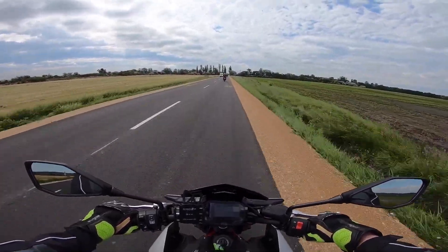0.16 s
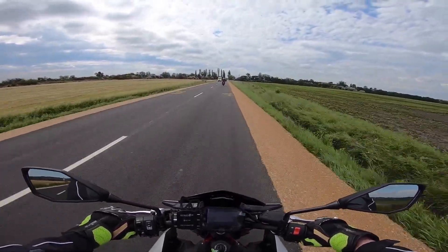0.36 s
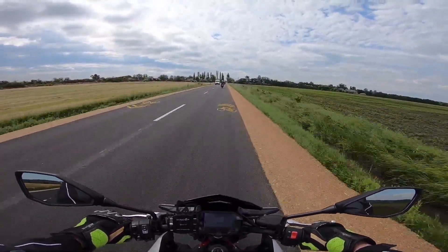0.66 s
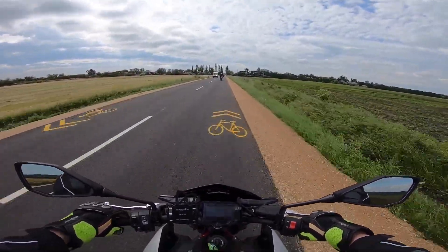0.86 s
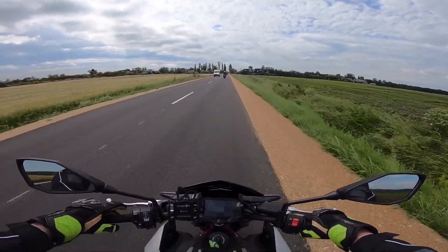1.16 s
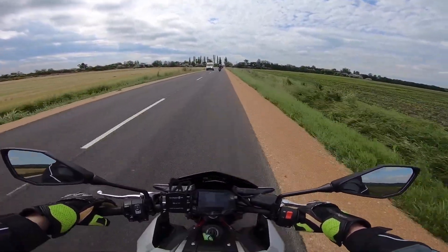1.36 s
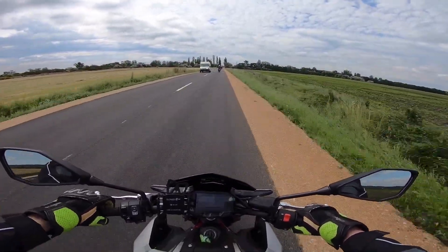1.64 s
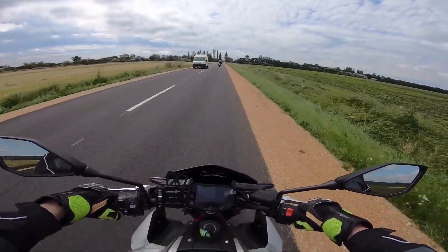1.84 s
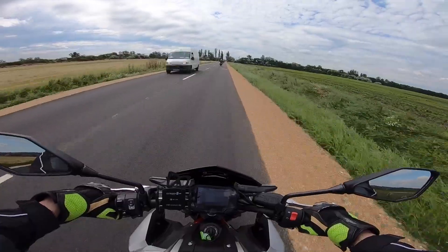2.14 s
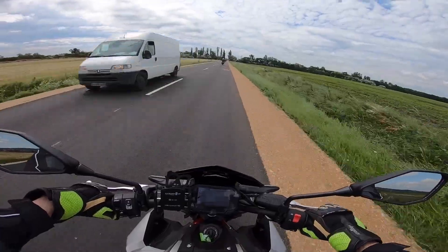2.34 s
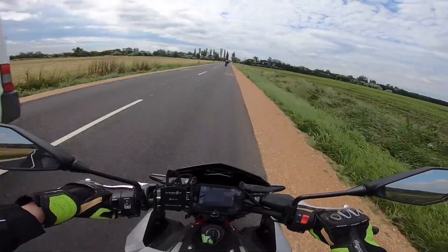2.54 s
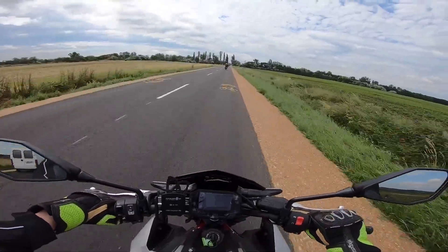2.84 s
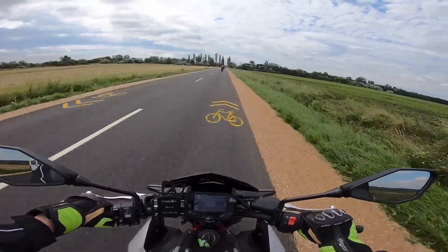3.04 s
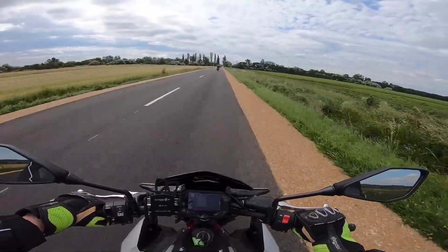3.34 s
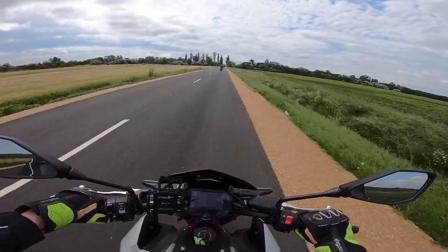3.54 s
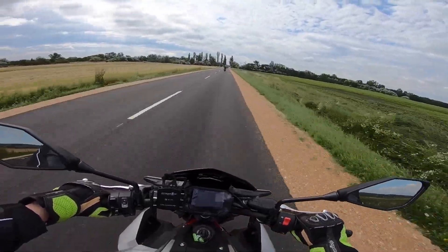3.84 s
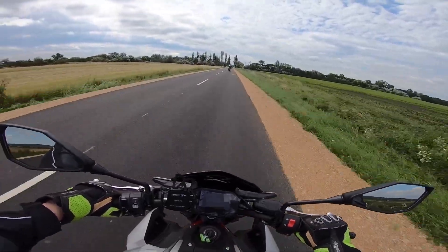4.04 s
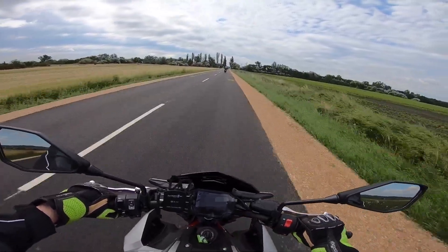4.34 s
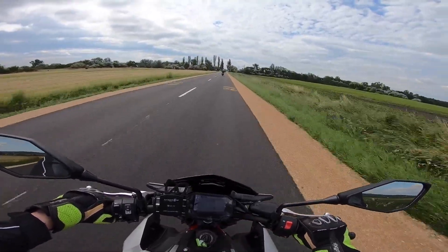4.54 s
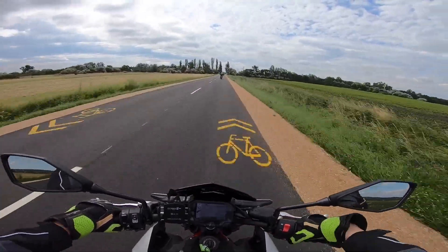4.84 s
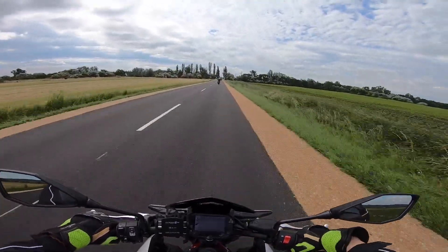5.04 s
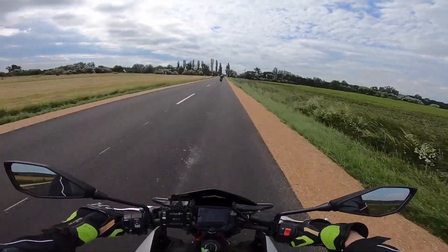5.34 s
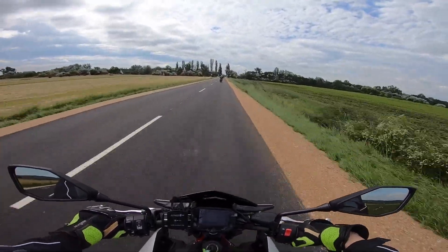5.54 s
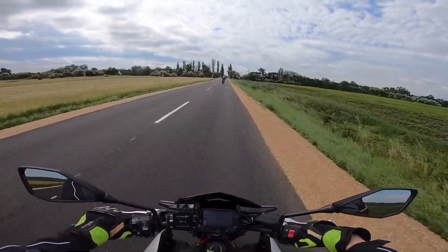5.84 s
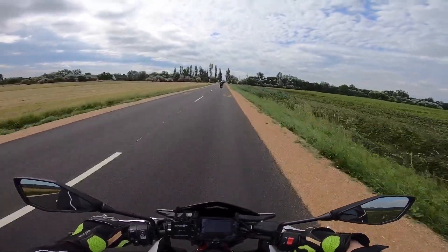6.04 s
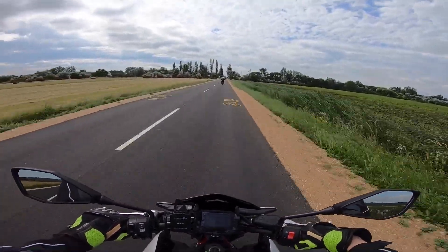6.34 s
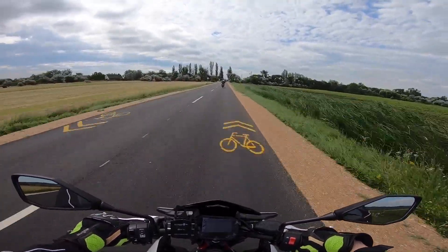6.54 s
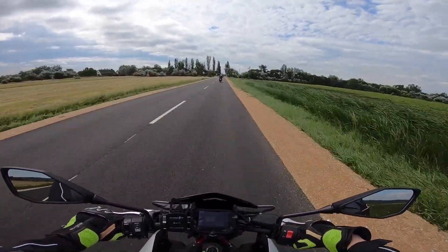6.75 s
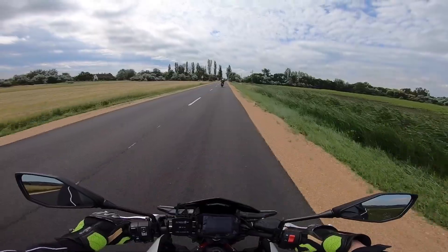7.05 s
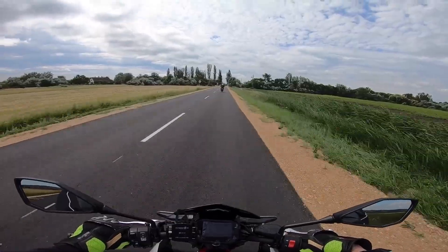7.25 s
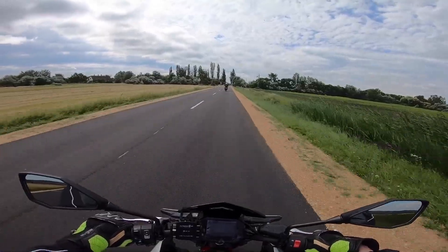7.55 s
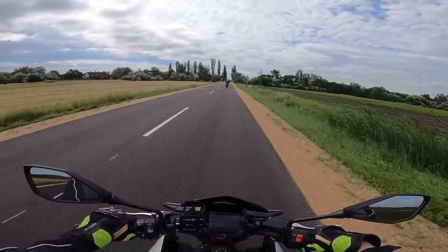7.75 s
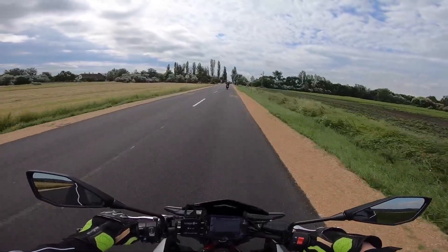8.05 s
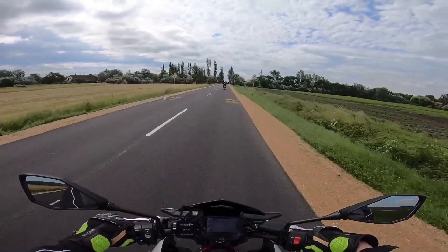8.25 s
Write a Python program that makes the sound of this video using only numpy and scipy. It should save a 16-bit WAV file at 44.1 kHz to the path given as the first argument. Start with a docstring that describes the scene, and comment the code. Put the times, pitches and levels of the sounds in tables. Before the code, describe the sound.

A four-cylinder motorcycle cruises on an open road, heard from the rider's chest, with a droning exhaust, thin gear whine and tyre hum under heavy wind buffeting. The throttle opens and the intake roars, engine pitch and wind climbing together. Then the throttle snaps shut, the roar drops away and the bike coasts with falling pitch, while gusts thump the microphone and the wind eases.

```python
"""A four-cylinder motorcycle on an open road, heard from the rider's chest, in one gear throughout.
It cruises first: the exhaust drones, the gears whine, wind buffets the microphone and the tyres hum.
At 2.4 s the throttle rolls open, the airbox roars, and engine pitch and wind climb with the speed.
At 4.9 s the throttle snaps shut and the bike coasts: the roar drops away and vortices thump the
microphone. From about 6.5 s a few faint edge whistles flick past as the wind eases."""
import sys
import numpy as np
from scipy import signal
from scipy.fft import rfft, irfft, next_fast_len
from scipy.io import wavfile
from scipy.ndimage import uniform_filter1d, map_coordinates

SR = 44100
rng = np.random.default_rng(int(sys.argv[2]) if len(sys.argv) > 2 else 0)


def bounce(signal):
    """Save signal as a 16-bit WAV file at the path given by the first command-line argument."""
    frames = np.transpose(np.atleast_2d(signal))
    limited = np.clip(frames, -1, 1)
    pcm = np.round(limited * 32767).astype(np.int16)
    wavfile.write(sys.argv[1], SR, pcm)


N = 369999
TIME = np.arange(N) / SR

OPEN_S, OPENING_S, SHUT_S, SHUTTING_S = 2.382, 0.43, 4.9, 0.072  # throttle moves: start and duration
MID_SPEED_HZ = 150  # octaves of speed are counted from this firing rate

# Engine speed, and so road speed. Each row: time in seconds, firing rate in Hz.
FIRING_RATE = [(0, 123), (1, 127.9), (2, 131.6), (2.5, 134.7), (3, 145.1), (4.5, 178.6), (4.92, 187.2),
               (6, 167.6), (7, 152.3), (7.5, 146.6), (8.4, 139.5)]
# The engine block's hum. Each row: multiple of the firing rate, level in dB.
BLOCK_HUM = [(2, -43), (4, -61), (5, -62), (6, -64), (7, -59), (10, -66)]
# Airbox boom from all four cylinders in step, boom from the two pairs in turn, and the higher rasp.
# Each row: frequency in Hz, gain in dB.
AIRBOX_IN_STEP = [(240, -23), (274, -20.5), (297, -43), (310, -31.5), (338, -27.5), (372, -28),
                  (425, -35.5), (450, -50.5), (545, -40.5), (630, -58)]
AIRBOX_IN_TURN = [(190, -57.5), (215, -44), (232, -25), (254, -20), (280, -23), (352, -19.5), (380, -24),
                  (420, -40), (465, -38), (620, -52)]
AIRBOX_RASP = [(150, -60), (260, -45), (380, -42), (500, -50), (615, -64), (700, -53), (780, -56),
               (870, -48.5), (925, -46), (975, -50), (1020, -44), (1070, -55), (1135, -48), (1230, -61),
               (1400, -57), (1900, -64), (2600, -62), (3300, -76)]
# Gear mesh rates. Each entry: one gear pair's multiple of the firing rate.
MESH_MULTIPLES = [7.55, 8.3, 11.31, 25.5]
# Whine of those pairs. Each row: cruising, pulling and coasting levels in dB, dB per octave of speed.
MESH_LEVELS = [(-53, -51.5, -64, 15), (-50, -47, -64, 3), (-52.5, -55.5, -62, 2.5),
               (-65.5, -62.5, -80, -3.5)]
# The engine casing's ring, for mesh tones and for their overtones. Each row: frequency in Hz, gain in dB.
CASING_FOR_MESH = [(920, 6.5), (980, -3), (1025, -1.5), (1100, -6), (1160, 2), (1250, -6.5), (1325, 2.5),
                   (1400, -2.5), (1525, 0.5), (1600, -4), (1790, -8), (1950, -1), (3100, -9), (3260, 1),
                   (3450, -1.5), (3560, -7), (3720, 1.5), (3870, -6.5), (4030, 3.5), (4180, -7), (4370, 5),
                   (4550, -9)]
CASING_FOR_OVERTONES = [(1800, -28), (2200, -21), (2330, -4), (2520, -15), (2850, -20), (3850, -20),
                        (4080, -4), (4250, -4), (4450, -16), (5900, -25), (6330, -12), (6550, -25),
                        (9500, -21)]
# Colours of the four wind layers, dark to bright. Each row: frequency in Hz, relative density in dB.
BUFFET_SPECTRUM = [(10, -14.5), (22, 0.5), (40, 1), (70, 3), (100, -2), (140, -8.5), (250, -28.5),
                   (600, -71.5)]
EDDY_SPECTRUM = [(50, -9.5), (100, 0), (150, 0), (210, -4), (270, -8.5), (360, -15), (450, -20), (600, -32),
                 (1500, -55)]
RUSH_SPECTRUM = [(200, -6), (450, 3.5), (650, 3), (950, 3), (1400, 1.5), (1800, -3), (2250, -10),
                 (2450, -6.5), (2850, -8), (3150, -14), (4200, -17.5), (6000, -28), (12000, -67.5)]
HISS_SPECTRUM = [(2000, -14), (4200, 3), (5200, 1.5), (6600, -1), (7800, -3.5), (8900, -6), (9900, -4.5),
                 (11500, -10.5), (13500, -12.5), (15700, -20.5)]
# Their faders. Each holds: level at mid speed in dB, dB per octave of speed, coasting change in dB.
BUFFET_FADER = (-25, 21.5, -2.9)
EDDY_FADER = (-27, 17.6, 3.2)
RUSH_FADER = (-42.5, 16.8, 2.07)
HISS_FADER = (-61, 24.3, 0)
# Puffs in the rush, gusts in the buffeting and lulls in all the wind.
# Each row: centre in seconds, half-width in seconds, level change in dB.
RUSH_PUFFS = [(.58, .035, 4.5), (1.35, 0.027, 4), (2.95, 0.17, 3.5), (5.32, 0.041, 3), (5.65, .18, 1.5),
              (6.2, .03, 2), (6.61, 0.03, 3)]
BUFFET_GUSTS = [(2.15, .4, 3.5), (5.55, .25, 2.5), (7.55, 0.54, 4)]
WIND_LULLS = [(4.962, 0.022, -5), (5.19, .07, -1), (8.33, 0.22, -2)]
# Vortices crossing the microphone. Each row: centre in seconds, suction in dB, half-width in seconds.
VORTEX_THUMPS = [(4.995, -11, 0.0053), (5.012, -12, .002), (5.117, -9, 0.0047), (5.287, -7, 0.00096),
                 (5.322, -9, .0013), (5.491, -5.5, .0015), (5.741, -7.5, 0.0014), (5.778, -14, 0.0016),
                 (6.208, -13, 0.00075), (6.991, -6.5, .0016), (7.249, -13.5, 0.0018)]
# Air whistling at an edge. Each row: centre in seconds, half-width in seconds, pitch in Hz, level in dB.
EDGE_WHISTLES = [(6.49, .04, 4950, -64), (6.655, .065, 4780, -56.5), (7.62, .05, 4530, -64.5),
                 (8.04, .05, 4430, -64)]


def amp(db):
    """Decibels to gain."""
    return 10 ** (np.asarray(db) / 20)


def unit(x):
    """Scale to rms 1."""
    return x / np.sqrt(np.mean(x ** 2) + 1e-20)


def eq_gain(points, hz):
    """Gain of an EQ curve of (Hz, dB) points, fading to silence an octave past either end."""
    point_hz, db = np.transpose(points)
    padded_hz = np.r_[point_hz[0] / 2, point_hz, point_hz[-1] * 2]
    return amp(np.interp(np.log(hz + 1e-3), np.log(padded_hz), np.r_[-120, db, -120]))


def wobble(rate):
    """A smooth random curve, rate knots a second."""
    knots = rng.standard_normal(int(N * rate / SR) + 4)
    coarse = TIME[::32]
    return np.interp(TIME, coarse, map_coordinates(knots, [coarse * rate]))


def filtered(x, response):
    """Filter x with a gain given as a function of Hz."""
    size = next_fast_len(N + SR // 2)
    return irfft(rfft(x, size) * response(np.fft.rfftfreq(size, 1 / SR)), size)[..., :N]


def noise(spectrum, patchy_db):
    """Noise of rms 1, coloured by (Hz, dB) points and mottled in time and frequency."""
    bins = signal.stft(rng.standard_normal(N), nperseg=512)[2]
    patches = uniform_filter1d(rng.standard_normal(bins.shape), size=6, axis=0)
    patches = unit(uniform_filter1d(patches, size=10, axis=1))
    mottled = signal.istft(bins * amp(patchy_db * 2 * np.tanh(patches / 2)), nperseg=512)[1][:N]
    return unit(filtered(mottled, lambda hz: eq_gain(spectrum, hz)))


def tone(turns):
    """A sine of rms 1 at a random starting phase."""
    return np.sqrt(2) * np.sin(2 * np.pi * (turns + rng.random()))


def ramp(start_s, length_s):
    """Rises from 0 to 1 and stays there."""
    return np.clip((TIME - start_s) / length_s, 0, 1)


def swells(rows):
    """A fader ride in dB made of bell-shaped swells and dips."""
    return sum(db * np.exp(-((TIME - centre_s) / width_s) ** 2) for centre_s, width_s, db in rows)


def throttled(cruise_db, pull_db, coast_db, lag_s=0, swell_s=OPENING_S):
    """A level that moves from cruising to pulling to coasting with the throttle."""
    opened, shut = ramp(OPEN_S + lag_s, swell_s), ramp(SHUT_S, SHUTTING_S)
    return (cruise_db + (pull_db - cruise_db) * opened) * (1 - shut) + coast_db * shut


def exhaust(turns):
    """The exhaust drones at the firing rate and swells a little after the intake."""
    level_db = throttled(cruise_db=-26.5, pull_db=-17.5, coast_db=-29.5, lag_s=0.31, swell_s=.18)
    return amp(level_db + 1.3 * wobble(20)) * tone(turns)


def engine_block(turns):
    """The block hums softly on harmonics of the firing rate."""
    return sum(amp(db + 1.4 * wobble(3)) * tone(multiple * turns) for multiple, db in BLOCK_HUM)


def airbox(firing_hz, turns, load_db):
    """The roar: harmonics of the four-stroke cycle sweep through the airbox resonances."""
    boom, rasp = np.zeros(N), np.zeros(N)
    uneven_turns = turns + .002 * wobble(120)
    imbalance = amp(0.46 * load_db)  # the cylinder pairs draw more unequally under load
    for harmonic in range(5, 80):
        multiple = harmonic / 4  # four firings to a cycle
        hz = firing_hz * multiple
        in_step = harmonic % 4 == 0
        if harmonic % 2 == 0 and harmonic <= 16:
            gain = eq_gain(AIRBOX_IN_STEP, hz) if in_step else imbalance * eq_gain(AIRBOX_IN_TURN, hz)
            boom += gain * tone(multiple * turns)
        else:
            accent_db = (4.5 if in_step else -1.5) + 2.2 * wobble(4)
            rasp += eq_gain(AIRBOX_RASP, hz) * amp(accent_db) * tone(multiple * uneven_turns)
    return amp(load_db) * (boom * amp(0.77 * wobble(25)) + rasp)


def gulps(turns, load_db):
    """Air tears past the throttle plates at every intake stroke, loudest from the nearest cylinder."""
    air = noise([(500, -15), (720, -13), (950, -3.5), (1400, 2), (2000, -21), (2700, -15),
                 (3500, -18.5), (7000, -33), (14000, -33.5)], patchy_db=2)
    strokes = unit(amp(3.5 * tone(turns) + 4 * tone(turns / 4)))
    return amp(load_db - 46) * air * strokes


def gears(firing_hz, turns, octaves):
    """Each gear pair sings at its mesh rate, fluttering, and blooms as it crosses a casing resonance."""
    out = np.zeros(N)
    for multiple, (*levels_db, db_per_octave) in zip(MESH_MULTIPLES, MESH_LEVELS):
        mesh_hz = multiple * firing_hz
        mesh_turns = multiple * (turns + .005 * wobble(45))
        whine = eq_gain(CASING_FOR_MESH, mesh_hz) * tone(mesh_turns)
        overtone = eq_gain(CASING_FOR_OVERTONES, 2 * mesh_hz) * tone(2 * mesh_turns)
        # every firing twists the shaft a little, which gives the high tones a sideband
        twist = .02 * multiple * amp(2 * wobble(9))
        sideband = twist * eq_gain(CASING_FOR_MESH, mesh_hz + firing_hz) * tone(mesh_turns + turns)
        flutter_db = 1.2 * wobble(8) + 2 * wobble(40)
        level_db = throttled(*levels_db) + db_per_octave * octaves + flutter_db
        out += amp(level_db) * (whine + overtone + sideband)
    return out


def engine(firing_hz, octaves):
    """All engine layers lock to one firing phase; throttle and speed push the intake up in the mix."""
    load_db = throttled(cruise_db=-23, pull_db=-3, coast_db=-22.5) + 14 * octaves
    turns = np.cumsum(firing_hz) / SR + 0.007 * wobble(8)
    drone = exhaust(turns) + engine_block(turns)
    intake = airbox(firing_hz, turns, load_db) + gulps(turns, load_db)
    return drone + intake + gears(firing_hz, turns, octaves)


def wind(octaves):
    """Wind grows with speed. Large eddies buffet the microphone; their pressure flutters the top end."""
    coasting = ramp(SHUT_S, SHUTTING_S)
    buffet_db, eddy_db, rush_db, hiss_db = [
        db + db_per_octave * octaves + coast_change_db * coasting
        for db, db_per_octave, coast_change_db in (BUFFET_FADER, EDDY_FADER, RUSH_FADER, HISS_FADER)]
    gustiness, puff_db = wobble(22), swells(RUSH_PUFFS)
    buffet, eddies = noise(BUFFET_SPECTRUM, patchy_db=0.45), noise(EDDY_SPECTRUM, patchy_db=1.9)
    pressure = unit(buffet + eddies)
    rumble = amp(buffet_db + swells(BUFFET_GUSTS) + wobble(7)) * buffet
    rumble += amp(eddy_db + 0.89 * gustiness) * eddies
    flutter_db = .8 * gustiness - .55 * pressure
    rush = amp(rush_db + puff_db + flutter_db) * noise(RUSH_SPECTRUM, patchy_db=.7)
    hiss = amp(hiss_db + .5 * puff_db + .6 * wobble(20) + flutter_db) * noise(HISS_SPECTRUM, patchy_db=1)
    return amp(swells(WIND_LULLS)) * (rumble + rush + hiss)


def tyres():
    """A steady bed: the tyre cavities drone and the tread hisses on smooth asphalt."""
    road = noise([(150, -12.5), (200, -3.5), (260, 2), (320, -12), (450, -23.5), (700, -28),
                  (1000, -19), (1500, -29.5), (2700, -25), (4000, -44)], patchy_db=1)
    return amp(-41 + 0.82 * wobble(5)) * road


def vortices():
    """Thumps on the microphone: each vortex core sucks sharply, between two softer pushes."""
    out = np.zeros(N)
    for centre_s, db, width_s in VORTEX_THUMPS:
        offset = (TIME - centre_s) / width_s
        out -= amp(db) * (1 - offset ** 2) * np.exp(-offset ** 2 / 2)
    return out


def whistles():
    """Brief ragged edge tones that sag in pitch as they swell and fade."""
    out = np.zeros(N)
    for centre_s, width_s, hz, db in EDGE_WHISTLES:
        offset = (TIME - centre_s) / width_s
        pitch_hz = hz * (1 - .055 * np.tanh(offset) + .026 * wobble(900))
        envelope = amp(db + 3.3 * wobble(90)) * np.exp(-offset ** 2)
        out += envelope * tone(np.cumsum(pitch_hz) / SR)
    return out


def scene():
    """One speed curve drives engine and wind; the whole mix sits dead centre."""
    firing_hz = np.interp(TIME, *np.transpose(FIRING_RATE))
    octaves = np.log2(firing_hz / MID_SPEED_HZ)
    mono = engine(firing_hz, octaves) + wind(octaves) + vortices() + whistles() + tyres()
    return np.array([mono, mono])


def record(dry):
    """The bass leans slightly right, and the top is cut off at 15.7 kHz."""
    bass = filtered(dry, lambda hz: hz < 345)
    leaning = dry + bass * np.array([[-.02], [.02]])
    return filtered(leaning, lambda hz: hz < 15700)


dry = scene()
out = record(dry)
bounce(out)
```